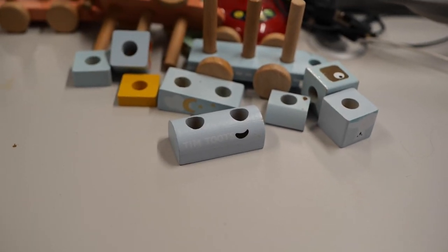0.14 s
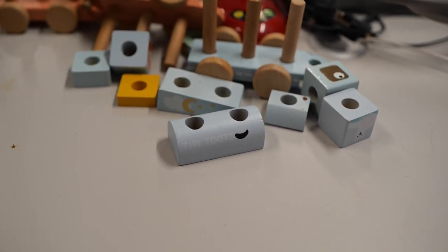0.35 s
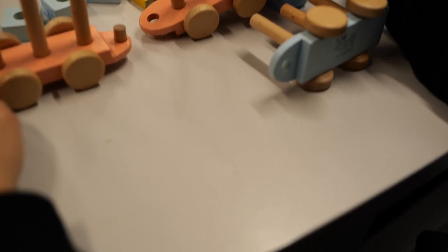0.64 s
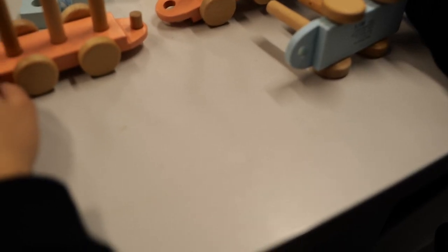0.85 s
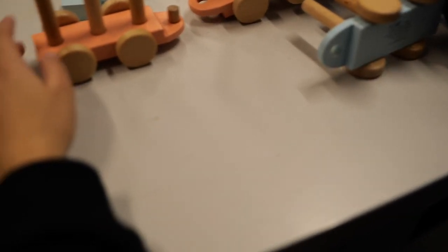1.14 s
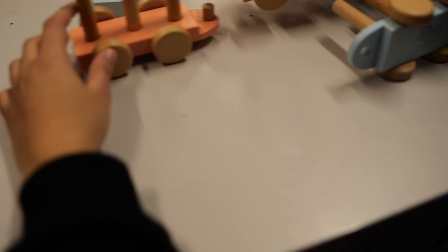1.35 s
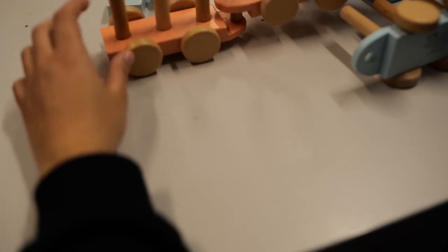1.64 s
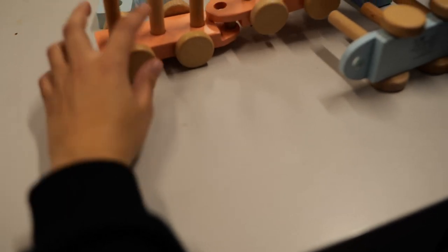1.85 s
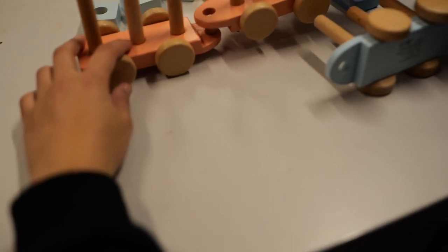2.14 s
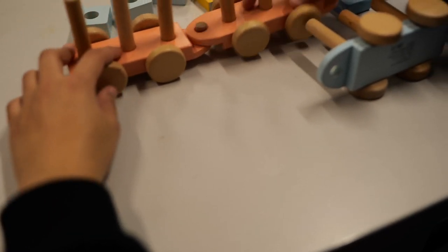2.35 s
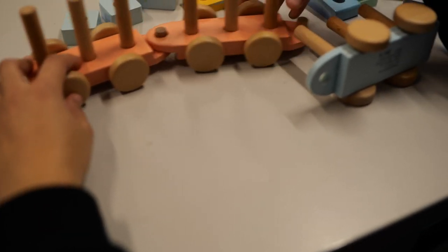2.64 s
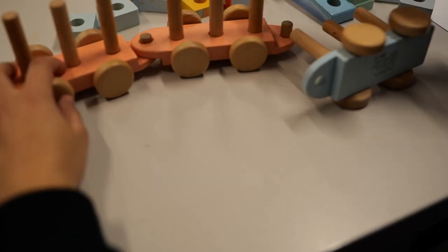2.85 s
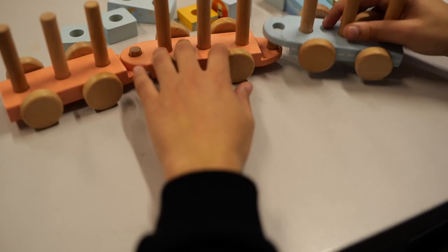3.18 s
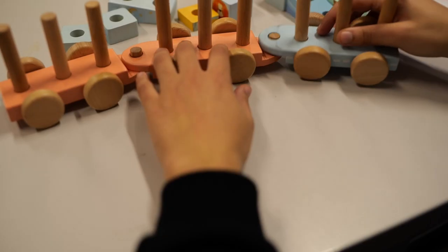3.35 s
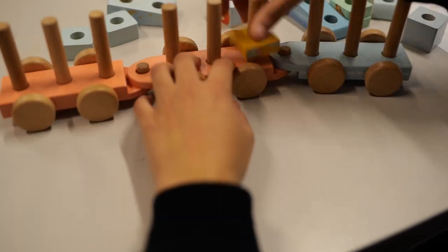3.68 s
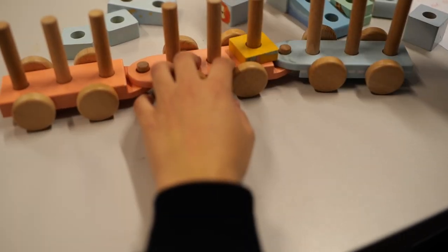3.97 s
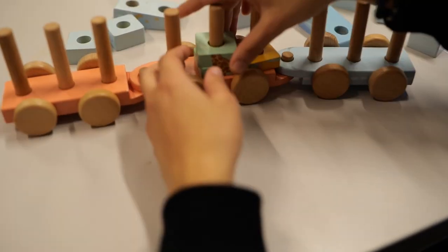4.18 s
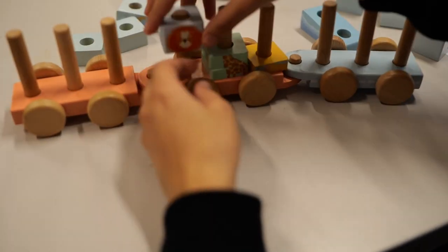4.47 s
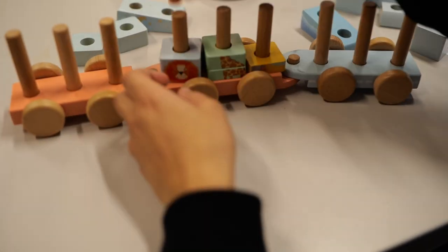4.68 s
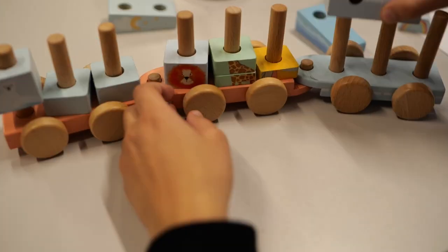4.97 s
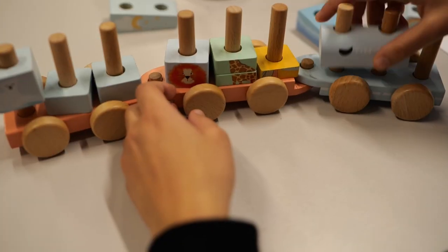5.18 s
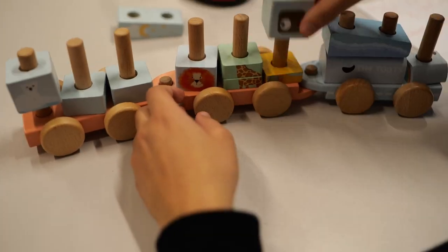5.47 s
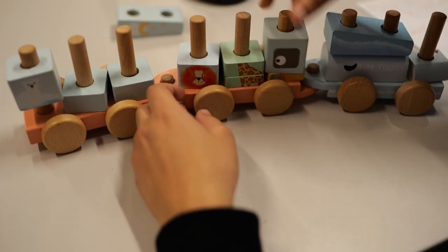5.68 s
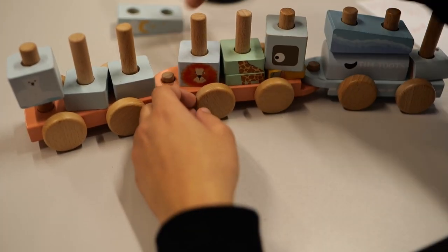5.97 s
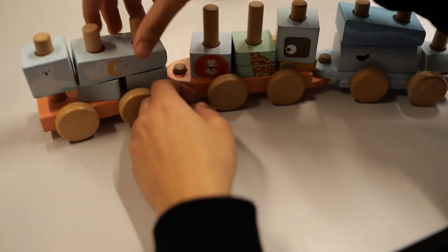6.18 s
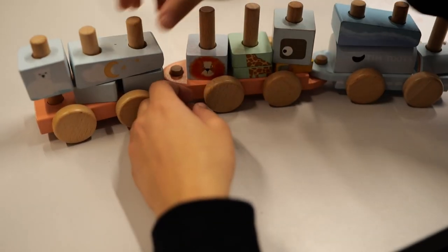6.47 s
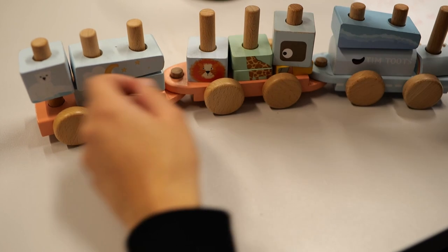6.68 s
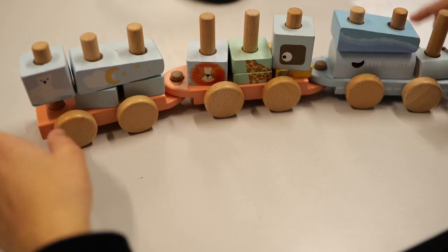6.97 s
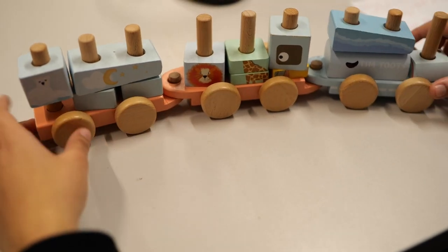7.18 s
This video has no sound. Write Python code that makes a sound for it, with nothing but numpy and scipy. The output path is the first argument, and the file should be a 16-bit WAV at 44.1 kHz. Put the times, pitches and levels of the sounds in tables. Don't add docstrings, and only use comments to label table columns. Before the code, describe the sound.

Wooden toy train wagons knock together and blocks drop onto pegs with sharp, short clacks on a table in a small quiet room.

```python
import sys
import numpy as np
from scipy import signal
from scipy.fft import rfft, irfft, next_fast_len
from scipy.io import wavfile
from scipy.ndimage import uniform_filter1d, map_coordinates

SR = 44100
rng = np.random.default_rng(int(sys.argv[2]) if len(sys.argv) > 2 else 0)


def dump_mix(stems):
    frames = np.atleast_2d(stems).T
    limited = np.clip(frames, -1, 1)
    pcm = np.round(limited * 32767).astype(np.int16)
    wavfile.write(sys.argv[1], SR, pcm)


def decibels_to_gain(level_db):
    exponent = np.asarray(level_db, float) / 20
    return 10 ** exponent


N = 323253

# (time [s], level [dB], ring [Hz], click re level [dB], table thud re level [dB])
WAGON_KNOCKS = [(.6701, -35, 970, -30, 11), (1.8106, -31.5, 1540, -16, 3.5), (2.0574, -19, 1415, -40, -1),
                (2.2954, -36, 1400, -12, -9), (2.3501, -33.5, 900, -28, -11),
                (2.4625, -15.5, 1580, -28, -6), (2.5016, -13.5, 1500, -36, -10.5),
                (2.5092, -18.5, 2650, -30, -17.5), (2.5135, -13.5, 1450, -28, -14),
                (2.7009, -10.5, 1700, -27, -8), (2.7117, -11, 1770, -27, -16), (2.724, -5, 1700, -24, -19),
                (2.7275, -1.5, 2300, -18, -38), (2.7395, -17, 1710, -21.5, -11),
                (2.7523, -12.5, 1650, -19.5, -16), (3.2052, -21, 1300, -27, -13),
                (3.4846, -23, 930, -21.5, -7), (3.4997, -24, 1750, -30.5, -1),
                (3.5435, -18, 1500, -34, -11.5), (3.5561, -19.5, 1600, -44, -22),
                (3.5657, -21.5, 1240, -34, -21), (3.7875, -30, 1550, -22, -5.5),
                (3.8269, -26.5, 1300, -20, -4), (3.8308, -22, 1550, -18, -5)]
PEG_DROPS = [(3.8437, -11, 3610, -5.5, -18), (3.8486, -14.5, 3200, 6, -11.5),
             (3.8868, -22, 3650, -14.5, -13), (4.2671, -18.5, 2450, -1, -12.5),
             (4.271, -21, 3000, -12, -19.5), (4.299, -17.5, 2080, 7, -31.5), (4.6818, -10, 3070, 5, -15),
             (4.709, -11.5, 2400, -10.5, -21.5), (4.711, -9.5, 2820, 2.5, -20),
             (4.7136, -3, 3500, -2.5, -21.5), (4.7435, -19, 2650, -22, -27.5),
             (4.7472, -10.5, 3100, -11, -15.5), (5.3506, -8.5, 1710, -21.5, -10.5),
             (5.3623, -2, 2720, -10.5, -24), (5.3717, -17, 2660, -10, -2.5), (5.3822, -13, 2300, -14, -3.5),
             (5.397, -19, 1860, -16.5, -9), (5.7732, -5, 2800, 5, -16.5), (5.7752, -14.5, 2000, 3.5, -26),
             (5.8158, -19, 2950, -12, -10.5), (6.233, -15.5, 2450, -8, -6), (6.2358, -22, 2000, -7.5, -16),
             (6.2441, -18.5, 1660, -17, -6.5), (6.2502, -12.5, 3190, 8, -10.5)]
REBOUND_KNOCKS = [(2.066, -27, 1400, -40, -3), (2.463, -20, 3150, -30, -25), (2.5178, -18, 1350, -35, -15),
                  (2.5212, -14, 910, -35, -15), (2.764, -11, 1500, -35, -25), (2.8005, -17, 1200, -35, -15),
                  (2.8105, -21, 1500, -35, -15), (2.819, -21, 1300, -35, -15), (2.838, -24, 1000, -35, -12),
                  (3.2056, -26, 3800, -30, -25), (3.485, -27, 2500, -30, -25),
                  (3.5002, -27, 2620, -30, -25), (3.544, -23.5, 2700, -30, -25),
                  (5.3585, -17, 2500, -12, -25), (5.3665, -14, 1700, -25, -20),
                  (5.391, -15, 2300, -25, -15), (5.791, -29, 4400, -12, -20), (5.85, -30, 3500, -10, -20),
                  (5.892, -30, 4300, -10, -20), (5.947, -35, 3570, -10, -20), (2.7293, -6, 2450, -24, -30),
                  (5.3632, -11, 3700, -20, -30), (1.811, -39, 3400, -25, -15), (.676, -44, 2750, -25, -10)]
FIRST_ROCK = (2.758, -6.5, 1450, -20, -22.5)
# (time [s], level [dB], ring [Hz], table thud re level [dB])
LIGHT_TOUCHES = [(.4733, -46, 3600, -6), (.9518, -40.5, 900, 6), (1.945, -41, 1000, 2.5),
                 (2.02, -36.5, 960, -25), (2.334, -46, 966, 17), (2.683, -28.5, 950, 0.8),
                 (3.19, -35, 1594, -31), (3.3359, -38, 1260, 11.5), (3.9123, -29, 3460, -10),
                 (4.3445, -33.5, 2730, -15.5), (4.6186, -38.5, 2400, 2.2), (4.9024, -37.5, 1320, -16.5),
                 (4.9712, -42.5, 846, -13), (5.0423, -40.5, 1700, 10.5), (5.1556, -36, 1460, -3.5),
                 (5.211, -39, 1690, -24.5), (5.3245, -38, 1650, -7.5), (5.52, -44, 1190, -14),
                 (5.6, -45, 2810, 8.5), (5.723, -41.5, 1070, -9), (6.1373, -45.5, 1180, 5),
                 (6.1475, -39, 1040, 6.5), (7.1708, -41.5, 1010, 4), (7.1922, -40.5, 2770, -8.5),
                 (7.2743, -42, 1460, 1.5), (7.2985, -43.5, 2750, -3)]

# (frequency [Hz], width [Hz], level [dB])
FIRST_PIECES = [
    [(886, 63, -3), (1146, 59, -8.5), (1800, 74, -7.5), (2700, 77, -8), (3900, 90, -10)],
    [(947, 130, 0), (1250, 59, -2), (1530, 100, 0), (2220, 150, -13), (3240, 300, -7), (3760, 160, -11)],
    [(1170, 28, 0), (1360, 27, 0), (1870, 22, -9), (2430, 15, -19), (3110, 61, -27)],
    [(910, 48, -9), (1580, 26, 0), (2670, 30, -16), (3150, 17, -14), (3600, 18, -27), (4570, 120, -26)],
    [(877, 55, 0), (1110, 44, -3), (1350, 130, -2), (2640, 36, 0), (3070, 33, -8), (3250, 29, -15),
     (3660, 66, -16)],
    [(974, 74, -5), (1200, 81, -7), (1360, 25, -3), (1610, 160, -2), (1910, 110, 0), (2300, 260, -1),
     (3170, 110, -3), (3800, 83, -13)],
    [(980, 110, -6), (1340, 27, 0), (1740, 82, -3), (2010, 15, -10), (2230, 27, -9), (2430, 31, -9),
     (2920, 80, -13)],
]
MIDDLE_PIECES = [
    [(867, 80, -12), (1250, 93, 0), (1580, 69, -5), (1820, 73, -10), (2760, 150, -8), (3850, 91, -19)],
    [(845, 20, -4), (1270, 110, 0), (1600, 69, -5), (2020, 24, -10), (2490, 170, -6), (3830, 100, -16),
     (4070, 40, -18)],
    [(1030, 140, -3), (1220, 40, 0), (1730, 23, -2), (2030, 21, -2), (2350, 24, -2), (2710, 15, -12),
     (3190, 25, -17)],
    [(1595, 78, -1.5), (2360, 270, -2), (3070, 60, -2.5), (3610, 110, -6.5), (4440, 150, -15.5),
     (4760, 100, -10.5)],
]
LATE_PIECES = [
    [(1950, 120, -7), (2560, 81, -3.5), (2770, 32.9, -12), (3070, 56, -1.5), (3640, 39, -6),
     (4370, 43, -15.5)],
    [(2000, 220, 1), (2454, 50, -13.5), (2670, 260, 3), (3000, 91, 4), (3610, 98, -3.5), (4830, 54, -21.5)],
    [(1180, 80, -7), (1620, 48, -2.5), (1840, 80, -1.5), (2270, 100, -5), (2660, 110, -3.5),
     (3700, 70, -1.5)],
    [(1583, 67, -5.5), (1960, 150, -4), (2500, 120, -8), (2950, 120, -7), (3560, 80, -.6), (4310, 80, -3)],
    [(1050, 200, -.6), (1500, 250, -3), (1900, 200, -8)],
    [(1650, 120, -2.5), (2450, 80, -4.5), (3586, 87, -6), (4880, 120, -7), (6040, 160, -10)],
]
PIECE_TIMES = [0, 1.7, 2.0, 2.4, 2.49, 2.6, 2.755, 3.1, 3.3, 3.53, 3.84, 4.1, 4.5, 4.9, 5.55, 6.13, 6.2]
PIECE_PAN = [0.9, 1.1, 0.8, 1.2, -0.6, -1.8, -1.9, -3, -3.1, -2.9, 2.1, 1.4, 1.7, -3, 0.6, -1.2, 1.2]
PIECE_WET = [-2, -2.2, -1.8, -2.4, -3, -0.6, 0.8, -0.6, 0.8, -0.7, -0.6, -3.5, 0.2, -0.6, 2.2, -1.2, -0.6]
PIECE_SOFT = [4500, 4200, 3200, 3900, 3700, 4200, 4000, 4800, 4500, 4200, 6000, 6000, 6000, 4800, 6500,
              3000, 6500]
PIECE_FREE = [.9, .7, .6, .8, .7, .7, .65, .9, .75, .55, .9, .9, .8, .6, .6, .6, .7]
# (frequency [Hz], level [dB], t60 [s])
TABLE_MODES = [(157.3, -8.5, 0.13), (237.3, -1, 0.098), (310.4, 4.5, 0.075), (406, -3, 0.11),
               (562.4, -3.5, 0.051), (748, -4, 0.035)]

SCENE_CHANGES = [
    .075,
    .47,
    3.219,
    3.697,
    4.902,
    5.498,
    6.13,
]
# (delay [s], level [dB])
WALL_ECHOES = [(.0025, -10.5), (0.0097, -11.5), (0.0155, -14), (.019, -26.5), (.026, -21)]
# (frequency [Hz], early t60 [s], late t60 [s])
ROOM_DECAY = [(201.8, 0.25, 0.62), (533, 0.68, 0.28), (1480, 0.18, 0.83), (3775, 0.15, 0.96),
              (9900, .2, 0.79), (15000, 0.047, 0.22)]
# (frequency [Hz], likeness [1])
TAIL_ALIKE = [(250, 1), (700, 0.93), (1500, .7), (7000, 0.55), (15000, .35)]

# (time [s], peak [dB], frequency
# [Hz], t60 [s])
DRY_TICKS = [(.473, -36, 1780, .018), (.0442, -31, 7000, 0.0044), (0.0446, -29, 10200, 0.0038),
             (0.5511, -24.5, 4220, 0.0023), (2.334, -47, 7540, 0.0043), (2.4622, -31, 6200, .015),
             (2.474, -43, 6000, .01), (2.7295, -26, 9500, .008), (2.7595, -30, 9500, .008),
             (5.351, -30, 9500, .006), (3.8305, -29, 6900, .014), (.045, -41, 1400, .008),
             (4.229, -46, 6940, 0.0061), (6.128, -32.5, 8670, 0.005), (6.493, -48, 9250, 0.0027)]
# (time [s], peak [dB], t60 [s])
WRIST_BUMPS = [
    (0.673, -20.5, 0.18),
    (0.949, -31, 0.085),
]

# (frequency [Hz], width [Hz], level [dB])
BORE_MODES = [(1000, 500, -12), (1640, 120, 4), (2720, 120, -6), (3756, 160, -23.5), (6400, 740, -20.5),
              (7400, 500, -20)]
PEG_MODES = [(2400, 250, -5), (3080, 140, -1.5), (3730, 130, -4), (7200, 1200, -14.5)]
RUB_MODES = [(1060, 560, 5.5), (1500, 1410, -0.5), (2600, 350, -18), (6390, 700, -19)]
AXLE_MODES = [(2700, 220, 0), (3750, 250, -1.5)]

# (time [s], length [s], level [dB], change [dB])
BORE_STROKES = [
    (5.144, .2, -48.5, 2.5),
]
PEG_STROKES = [
    (.36, 0.14, -67.5, 5),
    (0.673, 0.074, -50, -17),
    (.74, 0.44, -66, -5),
    (2.1, 0.074, -64, 2.5),
    (2.22, .12, -69, 15),
    (2.43, .03, -62, 7),
    (4.17, .09, -77, 18),
    (4.36, 0.19, -64.5, -16),
]
RUB_STROKES = [
    (.675, .1, -50, -10),
    (4.905, .245, -50, -10),
    (5.6, .09, -49.5, -22.5),
    (5.71, 0.06, -61, 8),
    (6.135, .09, -45.5, -14.5),
]
AXLE_STROKES = [
    (.68, .12, -60, -8),
    (2.105, .07, -63, -2),
    (3.345, .035, -60, -5),
    (3.39, .09, -66, 3),
]
SLEEVE_STROKES = [(0, 0.046, -62.5, 5), (.045, .027, -45, -12), (.4, .11, -70, 16), (.51, 0.17, -60, -8),
                  (.67, .07, -56.5, -10), (.74, 0.57, -65.5, 1.5), (1.5, 0.41, -70, 8),
                  (2.28, 0.068, -64, 3.5), (5.15, 0.17, -62, -5), (5.53, .235, -68.5, 8.5),
                  (6.72, 0.38, -66.5, 2.5), (7.175, .1, -55, -18)]
# (frequency [Hz], density [dB per Hz])
CLOTH_COLOUR = [(1180, -31), (2000, -6), (2340, -10), (3650, -8), (9830, -10.5), (14800, -20),
                (16000, -32.5)]

# (time [s], level [dB])
VENT_LEVEL = [(0.0, -45.5), (1.92, -44.5), (2.78, -40.5), (3.06, -43.5), (4.69, -43.5), (4.82, -41),
              (5.73, -43), (6.43, -41.5), (6.78, -46), (7.33, -42.5)]
# (frequency [Hz], density [dB per Hz])
DUCT_COLOUR = [(15, -88.5), (25, -53), (97, -22), (134, -7), (181, -9.5), (243, -5), (279, -12.5),
               (319, -9)]
# (frequency [Hz], density [dB per Hz])
HISS_COLOUR = [(442, -22), (720, -24), (970, -31), (5350, -44), (8710, -43.5), (14600, -48.5),
               (16200, -60.5)]
# (frequency [Hz], likeness [1])
AIR_ALIKE = [(60, 1), (180, 1.0), (350, .997), (550, 0.99), (1650, 0.64), (4970, 0.2), (15000, 0.81)]


def contacts():
    span = next_fast_len(SR * 2 // 3)
    out, hits = np.zeros((2, N)), blows()
    rooms = rfft(room_answers(count=7), span)
    luck = rng.standard_normal((len(hits), 2, 20))
    grit = rng.standard_normal((len(hits), 3, 1800))
    point = signal.unit_impulse(1800)
    spray = unit(crack(point, 3800, 9300, t60=1) + 0.35 * crack(point, 9000, 13000, t60=1))
    bare_blow = crack(point, 630, 3600, t60=1)
    edges = crack(grit[:, 1:], 5800, 9800, t60=0.011)

    for i, (s, db, hz, click_db, thud_db) in enumerate(hits):
        held = np.searchsorted(PIECE_TIMES, s) - 1
        soften = signal.butter(3, min(PIECE_SOFT[held], 16000), fs=SR, output="sos")
        modes = piece_modes(held)
        mode_luck, table_luck = luck[i]

        block = ring(struck_face(modes, hz, PIECE_FREE[held]), mode_luck,
                     rise=0.00039, spread_db=1.8, detune=0.0078, size=1800)
        splinters = crack(grit[i, 0], hz / 1.69, hz * 1.366, t60=0.012)
        block = signal.sosfilt(soften, block + decibels_to_gain(-6.5) * splinters + 0.39 * bare_blow)
        block = 1.3 * block / np.abs(block).max()

        edge, apart = edges[i]
        click = decibels_to_gain(click_db) * (edge + 0.21 * apart * [[1], [-1]])
        thud = ring(TABLE_MODES, table_luck, rise=0.002, spread_db=1.5, detune=0.0071, size=7000)
        thud = decibels_to_gain(thud_db + 0.5) * thud

        all_faces = ring(np.multiply(modes, [1, 1, 0.52]), mode_luck,
                         rise=0.0009, spread_db=1.5, detune=0.0055, size=1800)
        body = unit(all_faces) + 0.8 * unit(crack(point, hz / 1.76, hz * 1.494, t60=1))
        around = np.std(block) * unit(signal.sosfilt(soften, body)) + 0.93 * np.std(click) * spray
        send = decibels_to_gain(PIECE_WET[held]) * np.pad(around, (0, 5200)) + 0.7 * thud
        sound = irfft(rfft(send, span) * rooms[int(s * 5) % len(rooms)], span)

        sound[:, :len(thud)] += thud
        sound[:, :len(block)] += (block + click) * pan(PIECE_PAN[held])
        add(out, s, decibels_to_gain(db + 1.0) * sound)
    return bass_cut(out, 110)


def blows():
    s, db, hz, click_db, thud_db = FIRST_ROCK
    gap_s, loss_db, click_loss_db, thud_gain_db = 0.0158, 4.5, 3.5, 4
    rocking = [(s + k * gap_s, db - k * loss_db, hz, click_db - k * click_loss_db, thud_db + k * thud_gain_db)
               for k in range(3)]
    touch_click_db = -17.5
    touches = [(s, db, hz, touch_click_db, thud_db) for s, db, hz, thud_db in LIGHT_TOUCHES]
    return WAGON_KNOCKS + PEG_DROPS + REBOUND_KNOCKS + rocking + touches


def piece_modes(held):
    modes = []
    for hz, width, db in (FIRST_PIECES + MIDDLE_PIECES + LATE_PIECES)[held]:
        width = max(width, 60)
        modes.append((hz, db + 20 * np.log10(width / 80), 1.97 / width))
    return modes


def struck_face(modes, hz, free):
    near = [(f, db - 8 * np.log2(f / hz) ** 2, t60 * free) for f, db, t60 in modes]
    return near + [(hz, -2, 0.014)]


def ring(modes, luck, rise, spread_db, detune, size):
    t = np.arange(size) / SR
    hz, db, t60 = np.transpose(modes)[:, :, None]
    strength, pitch = luck[:2 * len(modes)].reshape(2, -1, 1)
    decay = decibels_to_gain(db + spread_db * strength - 60 * t / t60)
    waves = decay * np.sin(2 * np.pi * hz * (1 + detune * pitch) * t)
    x = waves.sum(0) * (1 - np.exp(-t / rise))
    return x / np.abs(x).max()


def crack(noise, lo_hz, hi_hz, t60):
    burst = noise * decibels_to_gain(-60 * np.arange(noise.shape[-1]) / SR / t60)
    band = signal.butter(2, [lo_hz, min(hi_hz, 16000)], "band", fs=SR, output="sos")
    x = signal.sosfilt(band, burst)
    return x / np.abs(x).max(axis=-1, keepdims=True)


def room_answers(count):
    hz, t, (mid, side) = signal.stft(rng.standard_normal((2, count, SR // 2)), SR, nperseg=256)
    bands, early, late = np.transpose(ROOM_DECAY)
    quick = decibels_to_gain(-60 * t / along(np.c_[bands, early], hz)[:, None])
    slow = decibels_to_gain(-15 - 60 * t / along(np.c_[bands, late], hz)[:, None])
    turn = half_angle(TAIL_ALIKE, hz)[:, None]
    mid, side = mid * np.cos(turn), side * np.sin(turn)
    stereo = np.stack([mid + side, mid - side], axis=1)
    tail = signal.istft((quick + slow) * stereo, SR, nperseg=256)[1]
    tail = tail * np.clip(np.arange(tail.shape[-1]) / SR / 0.007, 0, 1) ** 2
    tail = decibels_to_gain(-10) * tail / np.linalg.norm(tail, axis=2, keepdims=True)
    for delay, db in WALL_ECHOES:
        shared, apart = rng.standard_normal((count, 1, 130)), rng.standard_normal((count, 2, 130))
        scatter = (shared + 0.71 * apart) * np.hanning(130)
        scatter = decibels_to_gain(db) * scatter / np.linalg.norm(scatter, axis=2, keepdims=True)
        tail[..., round(delay * SR):][..., :130] += scatter
    return tail


def add(out, s, sound):
    start = round(s * SR)
    stop = round(min([c for c in SCENE_CHANGES if c > s] + [N / SR]) * SR)
    kept = sound[:, :stop - start]
    size = kept.shape[1]
    out[:, start:start + size] += kept * np.clip(np.arange(size, 0, -1) / 130, 0, 1)


def ticks():
    out, grit = np.zeros((2, N)), rng.standard_normal((len(DRY_TICKS), 500))
    for (s, db, hz, t60), noise in zip(DRY_TICKS, grit):
        add(out, s, decibels_to_gain(db) * crack(noise, hz / 1.04, hz * 1.126, t60) * np.ones((2, 1)))
    return out


def bumps():
    out, luck = np.zeros((2, N)), rng.standard_normal((len(WRIST_BUMPS), 8))
    for (s, db, t60), mode_luck in zip(WRIST_BUMPS, luck):
        modes = [(115, 10, t60), (151.0, 10.5, t60), (200, 2.5, t60), (243, -8.5, t60 * 3)]
        push = ring(modes, mode_luck, rise=0.0087, spread_db=-3.5, detune=0.003, size=12000)
        add(out, s, decibels_to_gain(db + 3) * np.array([push, push]))
    return bass_cut(out, 70)


def scrapes():
    return (slide(BORE_MODES, BORE_STROKES, rough_db=1.5, pan_db=-3.5)
            + slide(PEG_MODES, PEG_STROKES, rough_db=3.0, pan_db=0.0)
            + slide(RUB_MODES, RUB_STROKES, rough_db=2.0, pan_db=-4.0)
            + slide(AXLE_MODES, AXLE_STROKES, rough_db=3.5, pan_db=-1.5))


def slide(modes, rows, rough_db, pan_db):
    grains = rng.standard_normal(N) * decibels_to_gain(rough_db * wobble(160) + 0.83 * wobble(35))

    def body(f):
        total = 0
        for k, (hz, width, db) in enumerate(modes):
            resonance = 1j * f * width / (hz * hz - f * f + 1j * f * width)
            total = total + (-1) ** k * decibels_to_gain(db) * resonance
        return total

    return strokes(rows) * unit(filtered(grains, body)) * pan(pan_db)


def strokes(rows):
    t = np.arange(0, N + 30, 30) / SR
    gain = np.zeros(len(t))
    for s, length, db, change_db in rows:
        gain += decibels_to_gain(np.interp(t, [s, s + length], [db, db + change_db], left=-120, right=-120))
    return np.interp(np.arange(N) / SR, t, uniform_filter1d(gain, size=10))


def sleeve():
    return strokes(SLEEVE_STROKES) * decibels_to_gain(1.5 * wobble(48)) * rush(CLOTH_COLOUR, [(3000, 0.19)])


def room_tone():
    air = rush(DUCT_COLOUR + HISS_COLOUR, AIR_ALIKE)
    rumble = filtered(air, lambda hz: 1 / (1 + (hz / 1100) ** 4))
    drift_db = np.interp(np.arange(N) / SR, *np.transpose(VENT_LEVEL)) + 2.0 * wobble(6)
    return decibels_to_gain(drift_db) * rumble + decibels_to_gain(-46.5) * (air - rumble)


def rush(spectrum, alike):
    def colour(hz):
        turn = half_angle(alike, hz)
        return decibels_to_gain(along(spectrum, hz)) * np.array([np.cos(turn), np.sin(turn)])

    mid, side = filtered(rng.standard_normal((2, N)), colour)
    return unit(np.array([mid + side, mid - side]))


def half_angle(alike, hz):
    return np.arccos(np.clip(along(alike, hz), -1, 1)) / 2


def pan(db):
    return decibels_to_gain([[db / 2], [-db / 2]])


def unit(x):
    return x / np.sqrt(np.mean(x ** 2) + 1e-20)


def along(points, hz):
    f, v = np.transpose(points)
    return np.interp(np.log(hz + 1), np.log(f + 1), v)


def wobble(rate):
    knots = rng.standard_normal(int(N * rate / SR) + 4)
    return map_coordinates(knots, [np.arange(N) * rate / SR])


def filtered(x, response):
    m = next_fast_len(N + SR // 2)
    return irfft(rfft(x, m) * response(np.fft.rfftfreq(m, 1 / SR)), m)[..., :N]


def bass_cut(x, hz):
    return filtered(x, lambda f: (1j * f / (1j * f + hz)) ** 2)


def scene():
    return contacts() + ticks() + bumps() + scrapes() + sleeve() + room_tone()


def band_limit(x):
    return signal.sosfilt(signal.butter(12, 16390, fs=SR, output="sos"), x)


def record(dry):
    x = filtered(dry, lambda f: 1 + 0.25 * 1j * f * 1500 / (9600 ** 2 - f * f + 1j * f * 1500))
    mid = x.mean(0)
    side = filtered(x[0] - mid, lambda f: f / np.hypot(f, 230))
    x = mid + side * [[1], [-1]]
    x = x / (1 + np.abs(x / 1.05) ** 6) ** (1 / 6)
    x = filtered(x, lambda f: 1 / (1 + (f / 15800) ** 16))
    return band_limit(x)


dry = scene()
out = record(dry)
dump_mix(out)
```